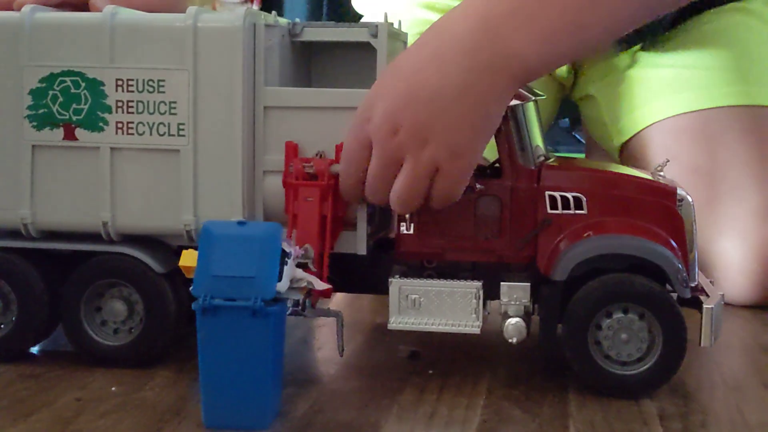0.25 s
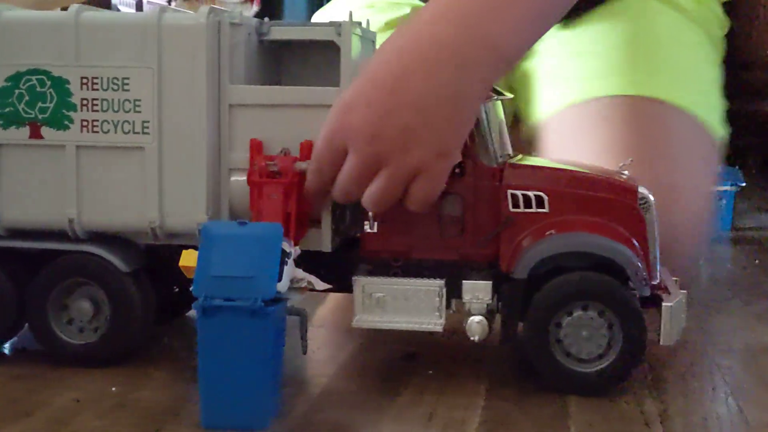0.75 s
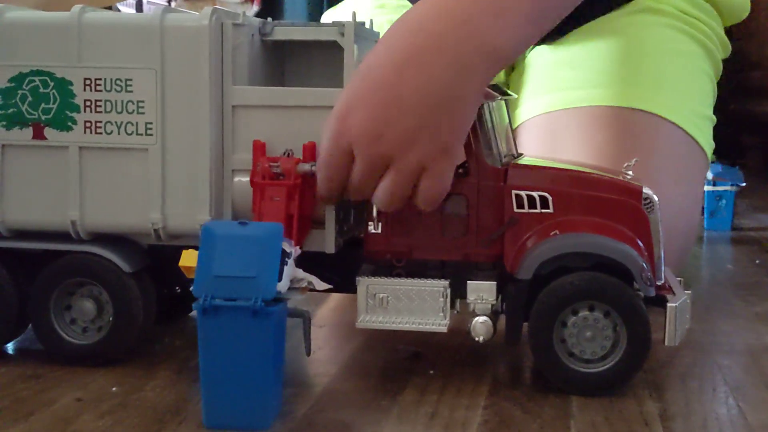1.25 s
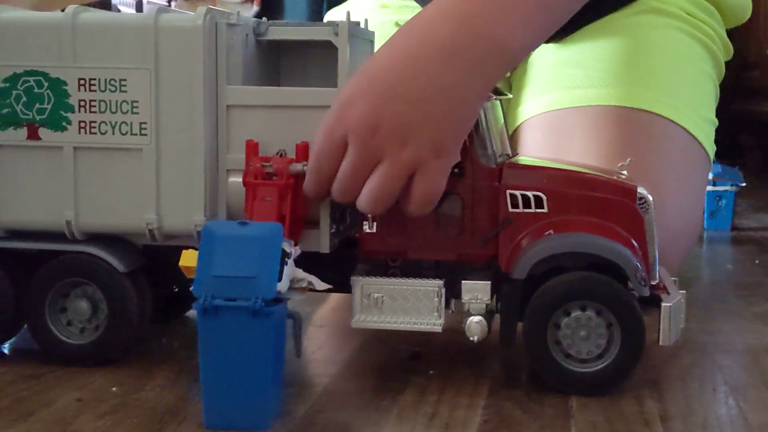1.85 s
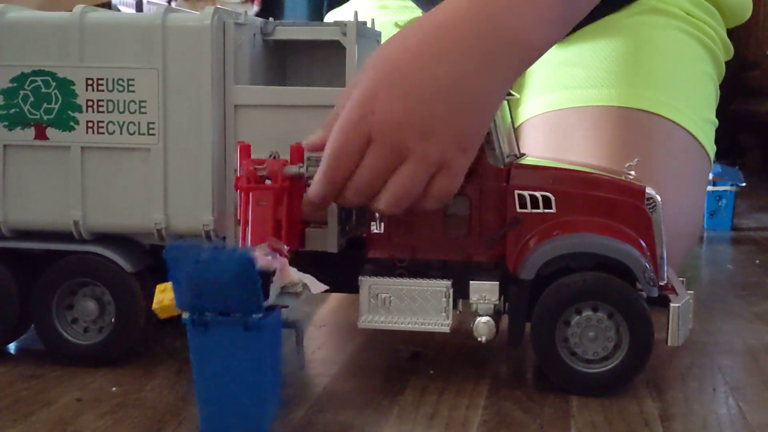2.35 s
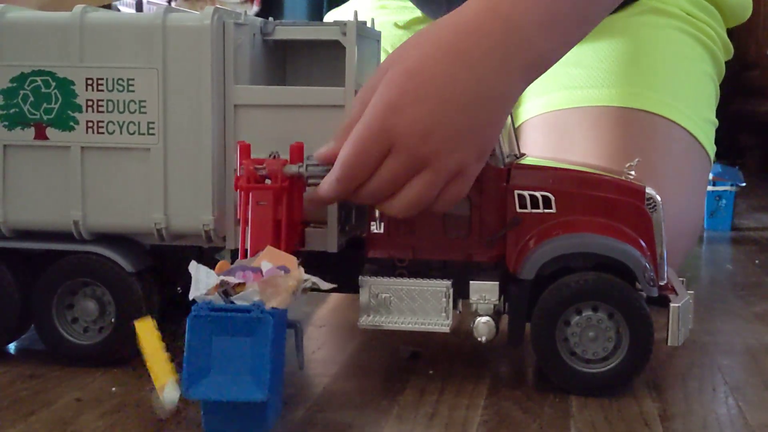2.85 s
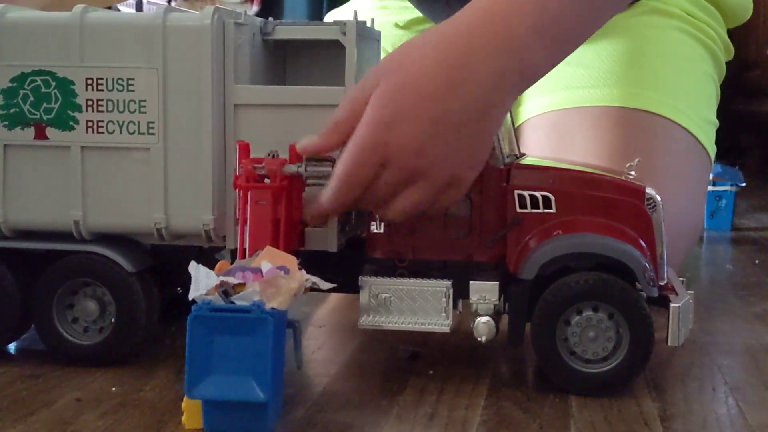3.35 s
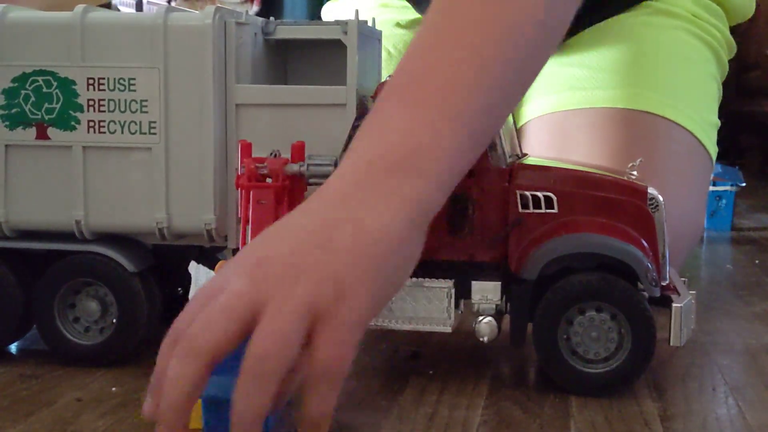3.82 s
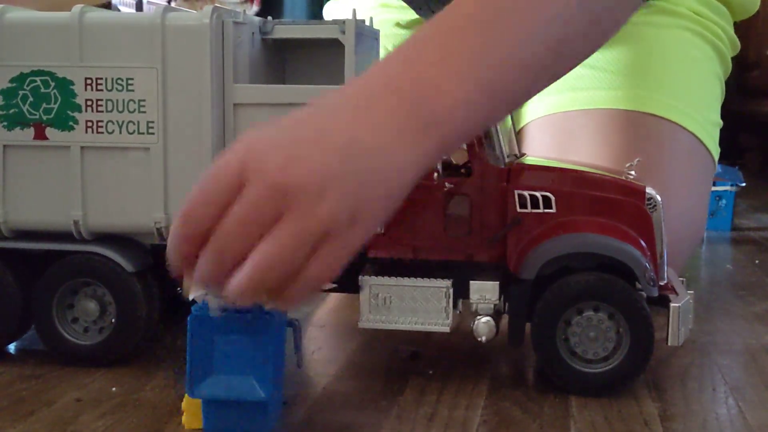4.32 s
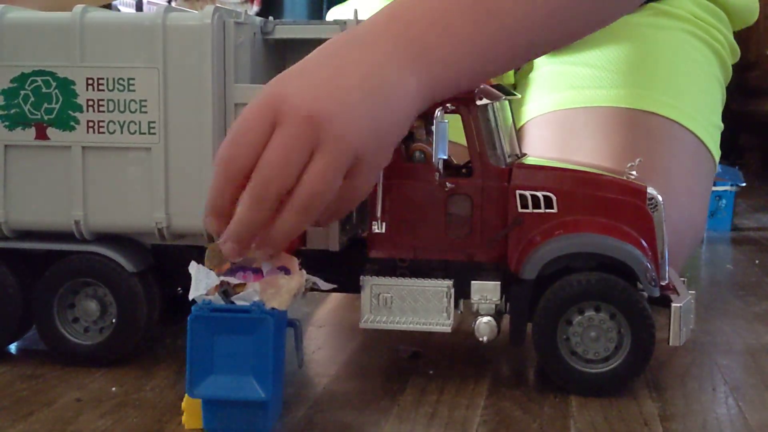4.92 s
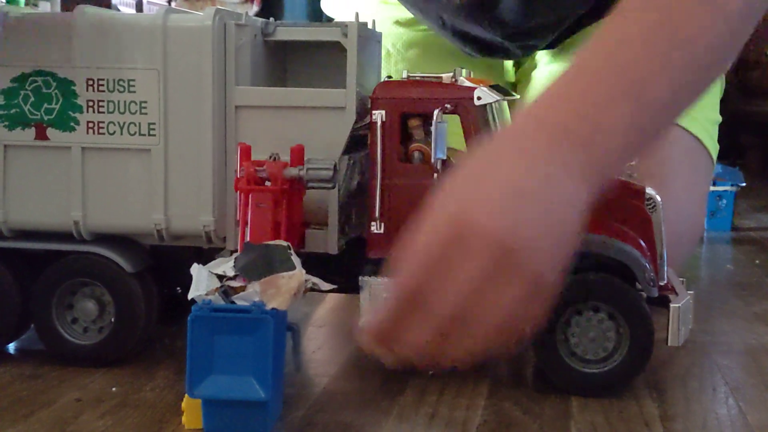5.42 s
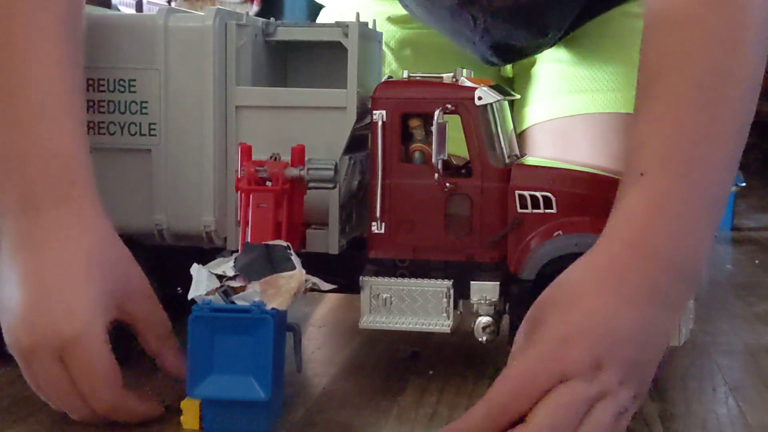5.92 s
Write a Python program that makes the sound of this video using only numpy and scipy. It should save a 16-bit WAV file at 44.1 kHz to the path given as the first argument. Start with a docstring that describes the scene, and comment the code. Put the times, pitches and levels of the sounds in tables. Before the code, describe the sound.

Close indoor toy play: short rolling rattle, plastic knocks and ratchety slides, a tumbling bin, a hard brick clatter, then quiet handling clicks on boards.

```python
"""Toy truck on a wooden floor

A big plastic toy truck is rolled a short way over the boards, close to the microphone. Its lifting arm
slides and knocks and tips a toy bin; a brick drops out and bounces. Then a hand scrapes things together.
Noise bursts strike resonant plastic and wood, rough grains make the rolling and sliding, and swelling low
notes make the soft bumps. A small living room adds its echo and a quiet hush."""
import sys
import numpy as np
from scipy import signal
from scipy.fft import rfft, irfft
from scipy.io import wavfile
from scipy.ndimage import uniform_filter1d

SR = 44100
rng = np.random.default_rng(int(sys.argv[2]) if len(sys.argv) > 2 else 0)


def put_to_file(sound):
    """Save the sound as 16-bit audio at rate SR, in the file named by the first command-line argument."""
    columns = np.atleast_2d(sound).T  # one column per channel
    safe = np.clip(columns, -1, 1)
    whole_steps = np.round(safe * 32767)
    wavfile.write(sys.argv[1], SR, whole_steps.astype(np.int16))


N = 272538
HIT_SIZE = 8192  # samples given to one short hit
TIME = np.arange(N) / SR
HIT_TIME = TIME[:HIT_SIZE]

# Colour of the room's hush: f/Hz, level/dB
AIR_COLOUR = [(18, -54), (30, -27), (55, -7), (80, 1), (135, -12), (200, -5), (328, -17), (540, -15),
              (620, -23), (721, -21), (850, -27), (1390, -28), (3580, -36), (8080, -33.5), (8740, -37),
              (16000, -42)]
# Resonances of the hush, with a narrow faint whine near 8 kHz: f/Hz, width/Hz, level/dB
AIR_MODES = [(1380, 160, -1), (2250, 300, -4), (3200, 300, -2), (4300, 250, -4), (5050, 300, -2),
             (7150, 250, 0), (8080, 150, 8)]
AIR_DB, AIR_WAVER_DB = -63, 0.8  # mean level before the waver, rms depth of the waver

# The room's tail: f/Hz, t60/s, relative level/dB
TAIL = [(150, 0.4, 5), (484, 0.9, -2), (1270, 0.62, -4), (2370, 0.44, -5.5), (4000, 0.4, -9),
        (5600, 0.38, -9.5), (7100, 0.48, -9.5), (13800, 0.083, -2)]

# Broad colour of the floorboards: f/Hz, level/dB
BOARD_COLOUR = [(18, -54), (30, -25.5), (76, -6), (136, 0.5), (188, -2.5), (277, -13.5), (521, -4),
                (590, -17.5), (647, -1.5), (1200, -18), (1560, -64), (2640, -120)]
# Resonances standing out of the boards: f/Hz, width/Hz, level/dB
BOARD_MODES = [(78, 14, 7.5), (210, 32, 5), (226, 34, 8.5), (310, 110, 3.5), (355.6, 14, -0.5),
               (460, 25, -3), (543, 160, 0.5)]
# The child leans on the boards: t/s, length/s, level/dB
LEANS = [(0.0, 1, -59.5), (1.27, 0.89, -59.5), (2.134, 0.92, -60), (2.9, 0.74, -65), (4.398, 0.76, -64.5),
         (5.066, 0.47, -62), (5.495, 0.74, -69.5)]
LEAN_ATTACK_S, LEAN_T60_S = 0.064, 0.27

# Nominal notes of the floor and the truck's box, depending on where the weight comes down (Hz)
JOIST, BOARD, PLANK_END, HOLLOW, CHASSIS = 125, 198, 200, 270, 385
# Soft bumps: t/s, f/Hz, thud level/dB, deep boom level/dB, cycles to fall 60 dB, cycles to swell
BUMPS = [(0.562, CHASSIS, -51.5, -71, 25, 0.9), (0.6, BOARD, -42, -66, 13.5, 1.3),
         (0.622, BOARD, -46.5, -46, 11, 0.66), (0.64, CHASSIS, -55.5, -66, 49, 2.8),
         (0.671, JOIST, -53.5, -47.5, 30, 0.97), (0.685, CHASSIS, -52.5, -60, 50, 3),
         (0.761, BOARD, -46, -66, 8.9, 0.6), (0.802, HOLLOW, -54, -56.5, 34, 2.2),
         (1.054, BOARD, -52, -75, 45, 1.3), (1.648, CHASSIS, -58, -65.5, 19, 0.7),
         (1.842, BOARD, -73, -81, 26, 0.9), (2.074, BOARD, -66.5, -78, 11, 0.66),
         (2.241, PLANK_END, -54.5, -80, 31, 1.1), (2.357, CHASSIS, -54, -86, 33, 1.5),
         (2.364, BOARD, -54, -84, 13, 0.9), (2.884, HOLLOW, -48.5, -56.5, 25, 0.9),
         (4.011, BOARD, -51, -49.5, 17, 1.2), (4.098, PLANK_END, -54, -55.5, 19, 1.3),
         (4.424, BOARD, -65.5, -66.5, 15, 0.85), (4.462, BOARD, -65, -57, 50, 0.96),
         (4.625, PLANK_END, -62.5, -57.5, 35, 1.3), (4.767, JOIST, -68, -67, 17, 0.9),
         (5.295, HOLLOW, -62.5, -69, 17, 2.3), (5.328, BOARD, -51.5, -68, 32, 5.9),
         (5.651, BOARD, -58.5, -61, 4.8, 1), (5.841, BOARD, -64, -79, 10.7, 1.32)]

# Broad colour of a scuff on wood: f/Hz, level/dB
SCUFF_COLOUR = [(100, -16), (220, -0.5), (480, -1.5), (800, -5), (1400, -13), (2500, -32.5), (6000, -21.5),
                (16000, -48)]
# Soft scuffs on the boards: t/s, length/s, level/dB
SCUFFS = [(0.606, 0.032, -46), (0.947, 0.028, -48), (1.515, 0.021, -52), (4.095, 0.049, -54.5),
          (4.625, 0.14, -66), (4.904, 0.093, -64), (5.059, 0.042, -66), (5.117, 0.025, -59.5),
          (5.226, 0.051, -64.5), (5.288, 0.028, -57.5), (5.324, 0.051, -63.5), (5.628, 0.02, -65)]
SCUFF_ATTACK_S, SCUFF_T60_S = 0.005, 0.04

# Broad colour of the hollow plastic shell: f/Hz, level/dB
SHELL_COLOUR = [(71, -35), (120, -7), (196, -0.5), (580, -7.5), (822, -14.5), (949, -15.5), (2200, -13.5),
                (3590, -16), (4230, -14), (6500, -13.5), (10600, -30.5), (15000, -30), (16000, -33)]
# Resonances of the shell: f/Hz, width/Hz, nominal level/dB
SHELL_MODES = [(337, 18, -5.5), (555, 46, -9.5), (862, 17, 17), (1170, 450, 0), (2350, 95, 1),
               (2410, 27, -1), (3100, 740, 1), (4300, 120, -2.5), (4940, 140, -8.5), (6400, 50, -5),
               (7090, 260, 4.5), (8840, 420, 4)]
# The bin and the lifting arm, ringing under many small contacts: f/Hz, width/Hz, level/dB
BIN_MODES = [(843, 55, 0), (1360, 52, 9), (2260, 92, 6), (3040, 380, -8)]

# Loose scraps clatter in the bin as it tips: t/s, length/s, level/dB
SPILLS = [(2.486, 0.068, -61), (2.583, 0.035, -49), (2.709, 0.11, -55.5)]

# Broad colour of scraped plastic and small hard pieces: f/Hz, level/dB
SCRAPE_COLOUR = [(290, -37.5), (500, 7.5), (868, -6.5), (1280, 0.5), (1740, -19), (2100, -7), (3650, -4.5),
                 (7100, -4), (10700, -16), (14200, -8), (16000, -24.5)]
# Light clicks of small pieces in the hand: t/s, level/dB
TICKS = [(4.105, -64), (4.119, -69), (4.128, -60), (4.156, -69), (4.182, -57.5), (4.189, -58), (4.22, -62),
         (4.244, -58), (4.256, -64), (4.685, -80.5), (4.74, -75.5), (4.875, -78.5), (5.196, -79.5),
         (5.226, -90), (5.425, -76), (5.582, -72.5), (5.691, -75.5), (5.929, -73), (5.942, -72.5)]

# Strokes of plastic sliding on plastic or wood: t/s, length/s, rasp level/dB, hiss level/dB
SLIDES = [(0.54, 0.19, -57, -59.5), (0.733, 0.15, -61, -48.5), (0.897, 0.061, -62.5, -55),
          (1.03, 0.044, -56, -57), (1.435, 0.09, -54.5, -62.5), (1.941, 0.1, -54, -58),
          (2.143, 0.14, -47, -51.5), (2.344, 0.099, -67, -61), (2.449, 0.13, -48.5, -59.5),
          (2.673, 0.13, -50, -55), (2.907, 0.082, -67, -60), (3.992, 0.12, -59.5, -60.5),
          (4.081, 0.043, -58.5, -44), (4.117, 0.073, -69, -54), (4.29, 0.034, -71, -61),
          (4.539, 0.3, -77, -78), (5.164, 0.062, -62, -63), (5.422, 0.03, -81.5, -66),
          (5.568, 0.018, -85, -62), (5.632, 0.086, -80, -68.5)]
# A stroke grips over the first part of its length, grows as the hand presses and dies when it lets go
SLIDE_ATTACK_SHARE, PRESS_DB_PER_S, SLIDE_T60_S = 0.54, 35.5, 0.17

# Broad colour of the brick: f/Hz, level/dB
BRICK_COLOUR = [(71, -31), (120, -9), (236, -0.5), (330, -6.5), (520, -10.5), (700, -4.5), (950, -10.5),
                (1580, -6), (1900, -3.5), (3600, 3), (4500, -3), (5630, -9), (6700, -3.5), (9400, -15),
                (10600, -33.5), (12000, -28.5), (14200, -37.5), (15300, -56.5), (16000, -65.5)]
# Resonances of the brick: f/Hz, width/Hz, nominal level/dB
BRICK_MODES = [(1270, 170, 7), (2250, 240, -1), (2930, 200, -4), (3680, 70, 5), (4200, 120, 2),
               (4800, 120, 0), (5190, 110, 2), (6570, 160, 5), (8450, 120, 3), (9270, 220, 10),
               (11800, 200, 15), (12700, 200, 9), (14100, 150, 10)]
# Brick and board ringing together on landing: f/Hz, width/Hz, level/dB
LANDING_MODES = [(704, 200, 5.5), (1173, 190, 16.5), (1880, 200, 6), (2304, 190, 8.5), (8800, 180, 8.5)]
BRICK_NOTE_HZ, BRICK_NOTE_WIDTH_HZ = 7120, 140  # the thin ping of its walls
# The landing, then the bounces: t/s, body/mids/edge level/dB (three columns), chatter t60/s, ping level/dB
BOUNCES = [(2.882, -43, -29, -40.5, 0.019, 8), (2.975, -74, -62, -63, 0.012, 3.5),
           (2.99, -76.5, -72, -61, 0.0054, 3), (3.0145, -64.5, -31.5, -30.5, 0.01, 4.5),
           (3.027, -53.5, -34.5, -33.5, 0.019, 7.5), (3.0615, -59, -41.5, -37, 0.012, 12.5),
           (3.073, -64, -41.5, -42, 0.021, 3), (3.094, -60, -51, -72, 0.0093, 10),
           (3.115, -72, -44, -52.5, 0.01, 2), (3.1215, -69, -46.5, -53.5, 0.017, -4),
           (3.134, -70, -55, -54.5, 0.016, 7), (3.148, -70, -44.5, -34.5, 0.032, 18),
           (3.172, -68, -50.5, -54.5, 0.02, 5)]

# The push: the truck gathers speed, is kept rolling, then coasts to rest
PUSH_S, PUSH_LENGTH_S, PUSH_ATTACK_S, COAST_T60_S = 0.48, 0.23, 0.19, 0.96
RUMBLE_DB, DEEP_DB, RATTLE_DB = -44, -50, -52.5  # levels before the speed shapes them

# Short ring added by each struck part of the truck, or the bin: f/Hz, width/Hz, level/dB
BOX = [(734, 420, 7.5), (1389, 95, -2.5)]
CAB = [(1202, 340, 1), (1600, 450, 1)]
ARM = [(506, 60, 8), (1250, 170, 11), (2145, 150, 19), (2640, 130, 6), (3140, 130, 5)]
WHEEL = [(2910, 200, 9.5)]
BIN = [(670, 110, 11), (829, 70, 21), (1550, 110, 9), (2400, 200, 14), (2890, 110, 10), (4240, 110, 13),
       (4390, 110, 8), (5010, 110, 12), (5710, 110, 7), (6590, 200, 5)]
BUMPER = [(520, 130, 15), (2250, 200, 6)]
# Knocks on the truck: t/s, struck part, body level/dB, mids level/dB, edge level/dB
KNOCKS = [(0.013, CAB, -62.5, -63, -66.5), (0.026, BOX, -54, -55, -74), (0.099, BOX, -81, -64, -68.5),
          (0.496, CAB, -76, -67, -59), (0.597, WHEEL, -60, -57.5, -64), (0.627, BOX, -43.5, -53, -57),
          (0.648, CAB, -46, -45, -56), (0.724, BOX, -48, -73, -65), (0.767, WHEEL, -49, -48, -57.5),
          (0.799, ARM, -79, -52, -68), (0.905, ARM, -81, -55, -74), (1.055, ARM, -55, -65, -60.5),
          (1.098, BOX, -58, -53.5, -50), (1.547, ARM, -55, -40.5, -55.5), (1.56, ARM, -69.5, -52.5, -61.5),
          (2.239, ARM, -52, -39.5, -45.5), (2.285, ARM, -59.5, -54, -48.5),
          (2.351, BUMPER, -56.5, -55, -71), (2.402, ARM, -70.5, -63, -67.5), (2.51, BIN, -79, -57.5, -65.5),
          (2.53, BIN, -75, -51.5, -63.5), (2.556, BIN, -59.5, -34, -34.5), (2.664, ARM, -61.5, -50, -57),
          (2.693, BOX, -63, -59.5, -52.5), (2.735, BOX, -68.5, -63.5, -57.5),
          (2.778, BIN, -63.5, -48.5, -47), (2.805, BIN, -69.5, -47, -63.5), (3.33, ARM, -61, -52, -68),
          (3.991, BOX, -57.5, -63, -70.5), (4.008, BOX, -56, -62.5, -69), (5.141, BOX, -65, -70.5, -69.5),
          (5.319, CAB, -56.5, -67.5, -97), (5.622, BUMPER, -57, -62, -64.5), (5.83, CAB, -76, -71.5, -74.5)]
SHARP_RISE_S, BLUNT_RISE_S = 0.0028, 0.009  # swell of the chatter in a bright and a dull knock
SPOT_SPREAD_DB, SPOT_DETUNE = 2.5, 0.011  # scatter between blows: resonance level, pitch as a fraction

BODY_HZ, EDGE_HZ = 700, 4000  # body lies below, edge above, mids between
TOP_HZ = 15900  # the recorder's upper limit


def amp(db):
    """Decibels to gain."""
    return 10 ** (np.asarray(db) / 20)


def unit(x):
    """Scale to rms 1."""
    return x / np.sqrt(np.mean(x ** 2))


def fade(t, t60):
    """Exponential decay, falling 60 dB in t60."""
    return np.exp(-np.log(1000) * t / t60)


def gesture(start_s, length_s, attack_s, release_t60):
    """A movement of the hand or body: smooth attack, hold, exponential release."""
    t = TIME - start_s
    attack = np.sin(np.pi / 2 * np.clip(t / attack_s, 0, 1)) ** 2
    return attack * fade(np.maximum(t - length_s, 0), release_t60)


def band(x, hz, kind):
    """Butterworth low-, high- or band-pass, designed at order four."""
    return signal.sosfilt(signal.butter(4, hz, kind, fs=SR, output="sos"), x)


def resonate(x, colour, modes=()):
    """Pass a force through an object: a causal broad colour with narrow resonances on top."""
    f = np.arange(HIT_SIZE // 2 + 1) * SR / HIT_SIZE
    hz, db = np.transpose(colour)
    # folding the cepstrum gives the colour minimum phase: no sound before the blow
    cepstrum = irfft(np.log(amp(np.interp(np.log(f + 1), np.log(hz), db))))
    cepstrum[1:HIT_SIZE // 2] *= 2
    cepstrum[HIT_SIZE // 2 + 1:] = 0
    peaks = 1 + sum(amp(g) * 1j * f * w / (c * c - f * f + 1j * f * w) for c, w, g in modes)
    response = irfft(np.exp(rfft(cepstrum)) * peaks)
    return signal.fftconvolve(x, response[None], axes=1)[:, :x.shape[1]]


def pair(size, apart_hz):
    """Noise at two microphones: alike in the bass, unrelated above apart_hz."""
    mid, side = rng.standard_normal((2, size))
    side = signal.sosfilt(signal.butter(2, apart_hz, "high", fs=SR, output="sos"), side)
    return np.array([mid + side, mid - side]) / np.sqrt(2)


def place(x, pan_db, shade_db=0, count=5):
    """Positive pan_db favours the left; the right comes count samples later, its lower treble shaded."""
    treble = signal.sosfilt(signal.butter(1, [4200, 9000], "band", fs=SR, output="sos"), x[1])
    shaded = x[1] - (1 - amp(-shade_db)) * treble
    right = np.pad(shaded, (count, 0))[:x.shape[1]]
    return np.array([x[0] * amp(pan_db / 2), right * amp(-pan_db / 2)])


def add(out, s, x):
    """Mix a short sound in at time s."""
    start = max(int(s * SR), 0)
    out[:, start:start + x.shape[1]] += x[:, :N - start]


def contact(chatter_db, chatter_t60, apart_hz, rise_s):
    """A blurred impact with a short burst of plastic chatter around it."""
    swell = 1 - np.exp(-(HIT_TIME / rise_s) ** 2)
    force = pair(HIT_SIZE, apart_hz) * fade(HIT_TIME, chatter_t60) * swell
    force *= amp(chatter_db) / np.sqrt(np.sum(force ** 2) / 2)
    force[:, int(rise_s * SR)] += 1  # the impact itself
    return force


def struck(modes):
    """Every blow lands on another spot, which favours other resonances and shifts them slightly."""
    chance = rng.standard_normal((len(modes), 2))
    return [(hz * (1 + SPOT_DETUNE * a), width, db + SPOT_SPREAD_DB * b)
            for (hz, width, db), (a, b) in zip(modes, chance)]


def weigh(x, body_db, mid_db, edge_db):
    """Where and how hard a blow lands tilts its colour towards the given strength of body, mids and edge."""
    parts = band(x, BODY_HZ, "low"), band(x, [BODY_HZ, EDGE_HZ], "band"), band(x, EDGE_HZ, "high")
    targets = body_db, mid_db, edge_db
    body, mid, edge = (db - 10 * np.log10(np.mean(p ** 2)) for p, db in zip(parts, targets))
    return resonate(x, [(450, body), (1100, mid), (3200, mid), (7000, edge)])


def grains(per_second, spread_db):
    """Random tiny impacts of uneven size, at a mean rate, scaled to rms 1."""
    size = amp(spread_db * np.minimum(rng.exponential(size=N), 3.5)) * rng.choice([-1, 1], N)
    return unit(size * (rng.random(N) < per_second / SR))


def waver(depth_db, size):
    """A gain that drifts at random; size is its smoothing in samples."""
    return amp(depth_db * unit(uniform_filter1d(rng.standard_normal(N), size=size)))


def hush():
    """The quiet of the room: coloured noise whose bass and treble waver slightly, each on its own."""
    air = unit(resonate(pair(N, apart_hz=692), AIR_COLOUR, AIR_MODES)) * amp(AIR_DB)
    bass = signal.sosfiltfilt(signal.butter(2, BODY_HZ, fs=SR, output="sos"), air)
    treble = air - bass
    return bass * waver(AIR_WAVER_DB, size=9000) + treble * waver(AIR_WAVER_DB, size=9000)


def room(x, early_db=-6, early_t60=0.15, late_db=-13):
    """Quick reflections off the floor and furniture, with a tail whose highest treble dies first."""
    t = TIME[:SR]
    hz, t60, db = np.transpose(TAIL)
    f, when, cells = signal.stft(pair(SR, apart_hz=450), SR, nperseg=512)
    t60, db = (np.interp(np.log(f + 1), np.log(hz), column)[:, None] for column in (t60, db))
    tail = signal.istft(cells * amp(db) * fade(when, t60), SR)[1][:, :SR]
    early = signal.lfilter([1], [1, -.3], pair(SR, apart_hz=447.0)) * fade(t, early_t60)
    echo = unit(early) * amp(early_db) + unit(tail) * amp(late_db)
    response = echo * (t > .004) / np.sqrt(SR)  # nothing returns within 4 ms
    return signal.fftconvolve(x, response, axes=1)[:, :N]


def leaning():
    """The boards murmur under shifting weight: small grains and noise excite their low resonances."""
    load = grains(per_second=120, spread_db=1.0) + .5 * pair(N, apart_hz=687)
    murmur = unit(band(resonate(load, BOARD_COLOUR, BOARD_MODES), [125, 400], "band"))
    weight = sum(amp(db) * gesture(s, length, LEAN_ATTACK_S, LEAN_T60_S) for s, length, db in LEANS)
    return place(murmur * weight, pan_db=2.3)


def bumps(note_share=0.92):
    """Soft pushes make boards and box boom; for equal cycles, a lower note swells and settles more slowly."""
    out = np.zeros((2, N))
    for s, note_hz, thud_db, deep_db, settle_cycles, swell_cycles in BUMPS:
        cycles = note_hz * (1 + .04 * rng.standard_normal()) * HIT_TIME  # pitch differs at each spot
        push = (1 - np.exp(-cycles / swell_cycles)) * fade(cycles, settle_cycles)
        boards = resonate(pair(HIT_SIZE, apart_hz=900) * push, BOARD_COLOUR, BOARD_MODES)
        thud = band(boards, [0.57 * note_hz, 1.576 * note_hz], "band")
        note = np.sin(2 * np.pi * cycles) * push
        # the whole floor gives
        sag = pair(HIT_SIZE, apart_hz=885) * fade(HIT_TIME, t60=0.23)
        deep = band(resonate(sag, BOARD_COLOUR, BOARD_MODES), 88, "low")
        boom = (unit(thud) + note_share * unit(note)) * amp(thud_db)
        add(out, s, boom + unit(deep) * amp(deep_db))
    return out


def scuffs():
    """A hand or a toy drags briefly over the boards, with a soft, woody grain."""
    friction = grains(per_second=450, spread_db=-0.5) + 0.45 * pair(N, apart_hz=907)
    drag = unit(resonate(friction, SCUFF_COLOUR))
    return drag * sum(amp(db) * gesture(s, length, SCUFF_ATTACK_S, SCUFF_T60_S) for s, length, db in SCUFFS)


def scraps():
    """Small loose pieces tumble against the wall of the bin, a few distinct clicks at a time."""
    clicks = grains(per_second=190, spread_db=-5.0) * np.ones((2, 1))  # same in both channels
    clatter = unit(band(resonate(clicks, SHELL_COLOUR, BIN_MODES), 600, "high"))
    tumble = sum(amp(db) * gesture(s, length, attack_s=0.0092, release_t60=0.055) for s, length, db in SPILLS)
    return place(clatter * tumble, pan_db=0.5)


def ticks():
    """Small hard pieces click together, with a bright ring."""
    out = np.zeros((2, N))
    for s, db in TICKS:
        force = contact(chatter_db=13, chatter_t60=.022, apart_hz=8000, rise_s=.0015)
        ring = resonate(force, SCRAPE_COLOUR, [(7400, 1500, 1.1), (9030, 110, 13.6)])
        add(out, s, unit(band(ring, 1490, "high")) * amp(db))
    return place(out, pan_db=15.5, shade_db=-8.5)  # negative shade brightens the right


def sliding():
    """Sliding plastic sticks and slips in dense little spurts: the bin rasps and the surface hisses."""
    grip = waver(2.7, size=300)  # the contact pressure wavers
    slips = (grains(per_second=1100, spread_db=3.2) + .55 * pair(N, apart_hz=1500)) * grip
    rasp = unit(band(resonate(slips, SHELL_COLOUR, BIN_MODES), [600, EDGE_HZ], "band"))
    hiss = unit(band(resonate(slips, SCRAPE_COLOUR, SHELL_MODES), EDGE_HZ, "high"))
    out = np.zeros((2, N))
    for s, length, rasp_db, hiss_db in SLIDES:
        # 0 dB halfway through the stroke
        pressure = amp(PRESS_DB_PER_S * (np.clip(TIME - s, 0, length) - length / 2))
        stroke = pressure * gesture(s, length, SLIDE_ATTACK_SHARE * length, SLIDE_T60_S)
        out += (rasp * amp(rasp_db) + hiss * amp(hiss_db)) * stroke
    return place(out, pan_db=3.5, shade_db=8.5)


def brick():
    """The brick lands with one clean smack on the wood, then clatters on its corners a little further left."""
    out = np.zeros((2, N))
    for k, (s, body_db, mid_db, edge_db, chatter_t60, ping_db) in enumerate(BOUNCES):
        modes = struck(BRICK_MODES) + [(BRICK_NOTE_HZ, BRICK_NOTE_WIDTH_HZ, ping_db)]
        if k == 0:
            force = contact(chatter_db=2.5, chatter_t60=chatter_t60, apart_hz=4000, rise_s=0.0015)
            modes = modes + LANDING_MODES
            seat = dict(pan_db=-1, shade_db=1, count=10)
        else:
            force = contact(chatter_db=8.5, chatter_t60=chatter_t60, apart_hz=8950, rise_s=0.11 * chatter_t60)
            seat = dict(pan_db=3.5, shade_db=10.5, count=6)
        ring = weigh(resonate(force, BRICK_COLOUR, modes), body_db, mid_db, edge_db)
        add(out, s - .0005, place(ring, **seat))  # chatter starts just ahead of the table time
    return out


def rolling():
    """Hard treads patter unevenly over the wood grain and shake the shell for as long as the truck moves."""
    treads = grains(per_second=700, spread_db=1.5) + .5 * pair(N, apart_hz=700)
    treads = treads * waver(1.8, size=700)
    rumble = unit(resonate(treads, BOARD_COLOUR, BOARD_MODES)) * amp(RUMBLE_DB)
    deep = unit(band(treads, [42, 92], "band")) * amp(DEEP_DB)
    rattle = unit(band(resonate(treads, SHELL_COLOUR, BIN_MODES), [600, 4500], "band")) * amp(RATTLE_DB)
    speed = gesture(PUSH_S, PUSH_LENGTH_S, PUSH_ATTACK_S, COAST_T60_S)
    return place((rumble + deep + rattle) * speed, pan_db=-0.5)


def knocks():
    """Loose parts and the bin strike the hollow truck, each with its own ring; dull blows chatter more."""
    out = np.zeros((2, N))
    for s, part, body_db, mid_db, edge_db in KNOCKS:
        if body_db > max(mid_db, edge_db):  # a dull blow
            force = contact(chatter_db=15.5, chatter_t60=0.048, apart_hz=5860, rise_s=BLUNT_RISE_S)
        else:
            force = contact(chatter_db=12.5, chatter_t60=0.03, apart_hz=5900, rise_s=SHARP_RISE_S)
        ring = resonate(force, SHELL_COLOUR, struck(SHELL_MODES) + part)
        add(out, s - .002, weigh(ring, body_db, mid_db, edge_db))  # chatter starts ahead of the table time
    return place(out, pan_db=4.0, shade_db=2.5)


def scene():
    """The hush, the toys and their echo; the brick falls closest, with a shorter echo and quieter tail."""
    floor = leaning() + bumps() + scuffs()
    toys = floor + scraps() + ticks() + sliding() + rolling() + knocks()
    near = brick()
    near_echo = room(near, early_db=-5.5, early_t60=0.12, late_db=-16.0)
    return hush() + toys + room(toys) + near + near_echo


def record(dry):
    """The recorder drops the deepest bass and cuts the top; the loudest peaks are gently rounded."""
    rounded = np.tanh(band(dry, 38, "high"))
    return signal.sosfilt(signal.ellip(10, .2, 80, TOP_HZ, fs=SR, output="sos"), rounded)


dry = scene()
out = record(dry)
put_to_file(out)
```